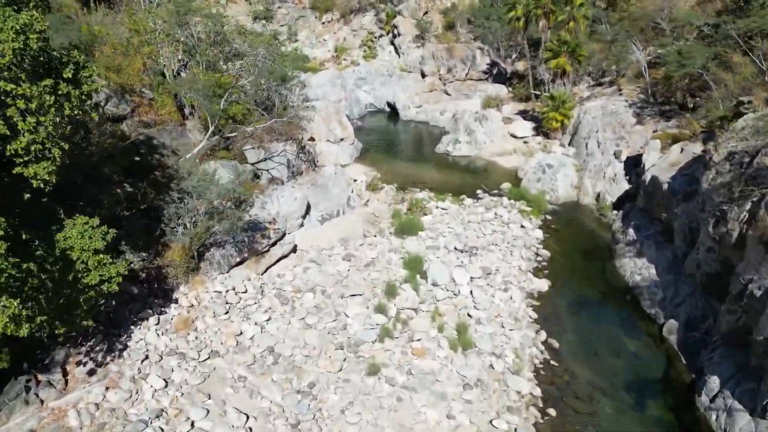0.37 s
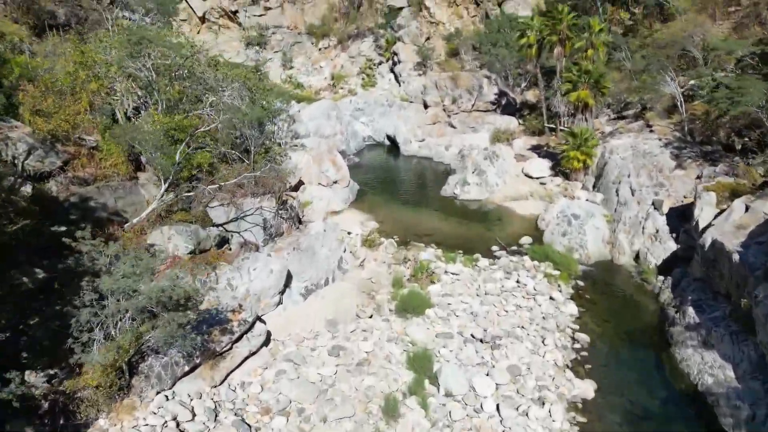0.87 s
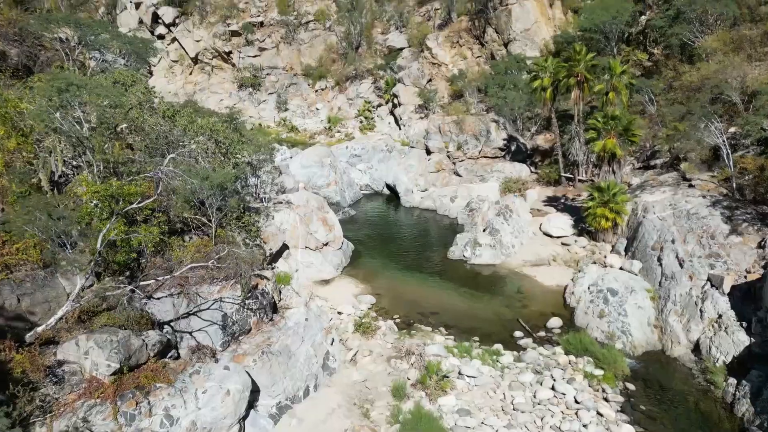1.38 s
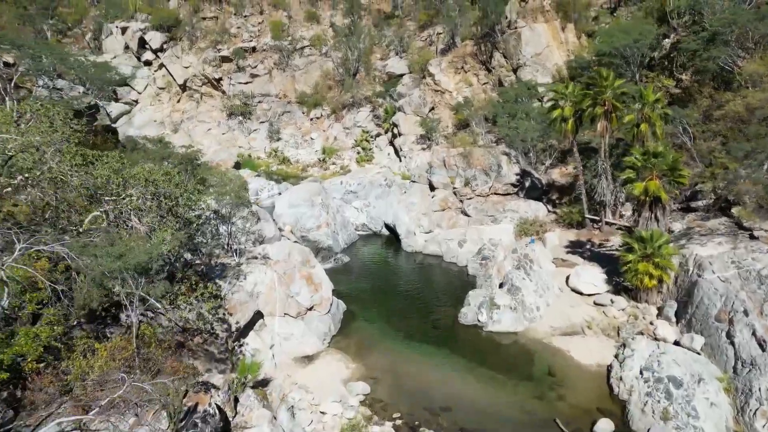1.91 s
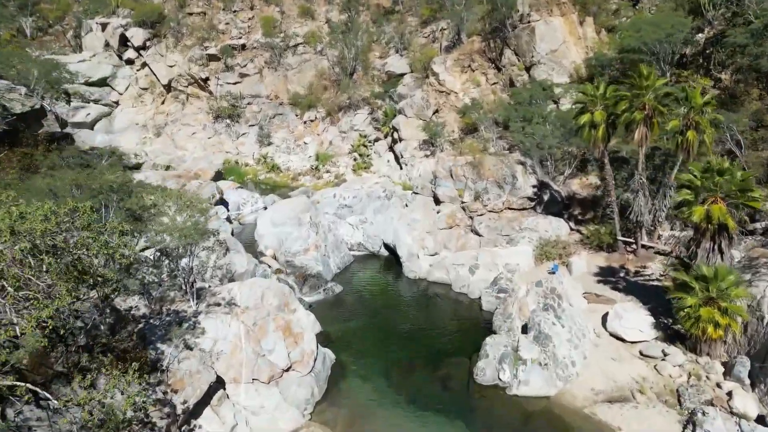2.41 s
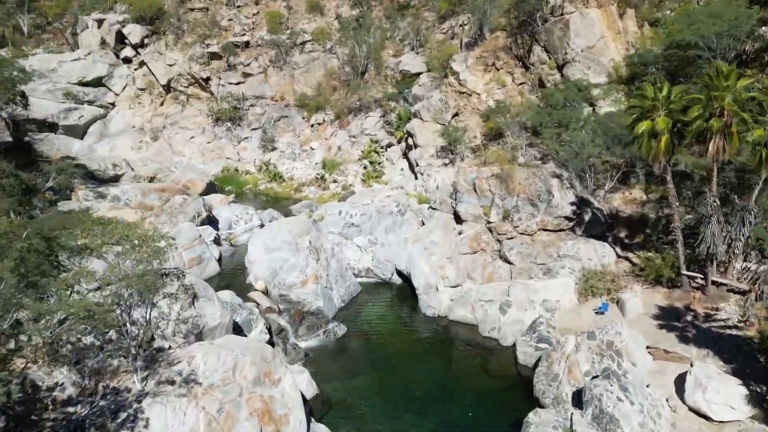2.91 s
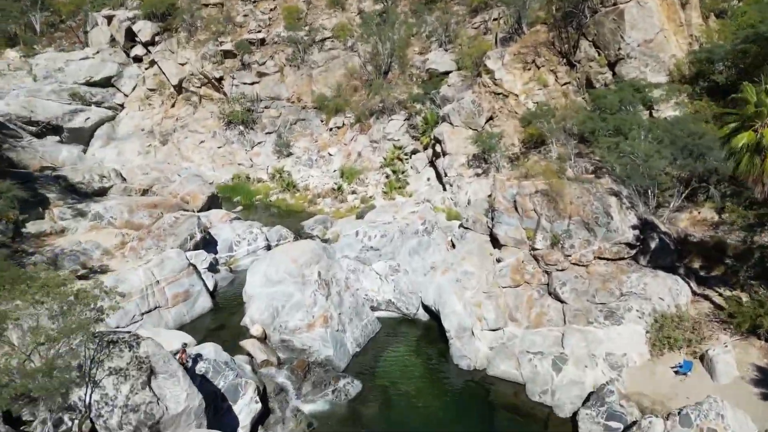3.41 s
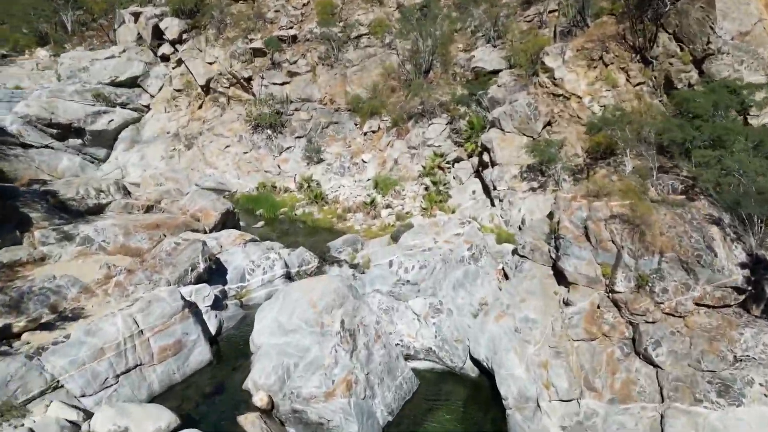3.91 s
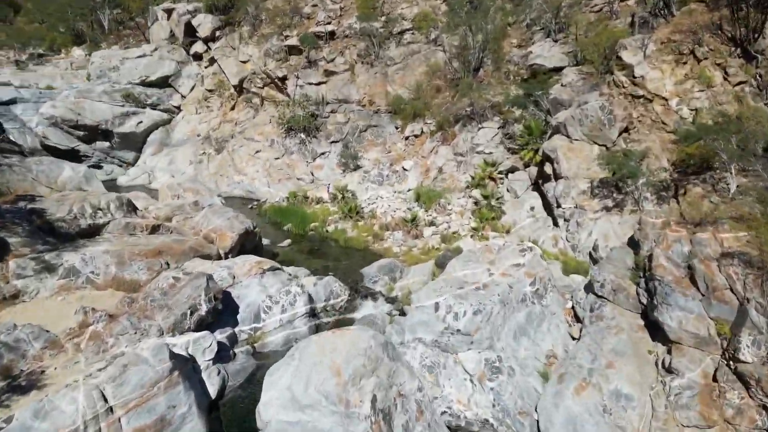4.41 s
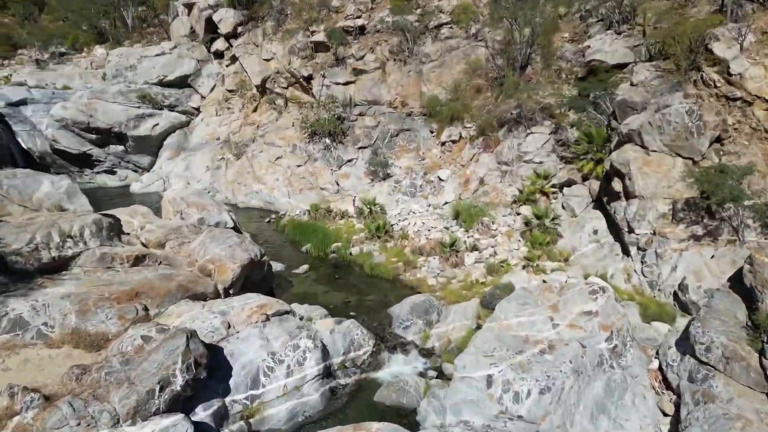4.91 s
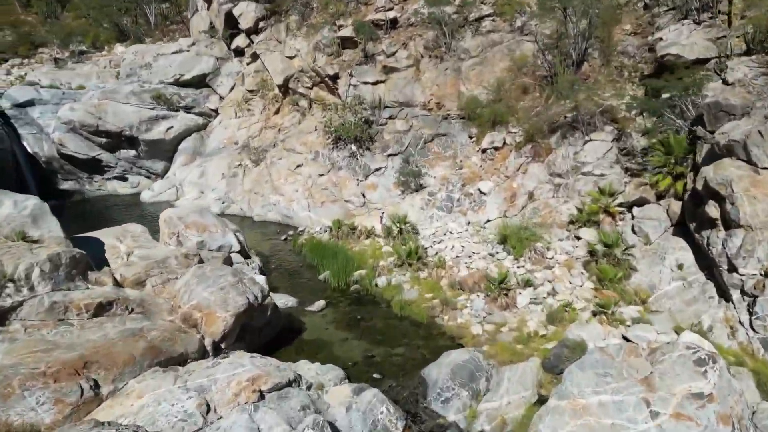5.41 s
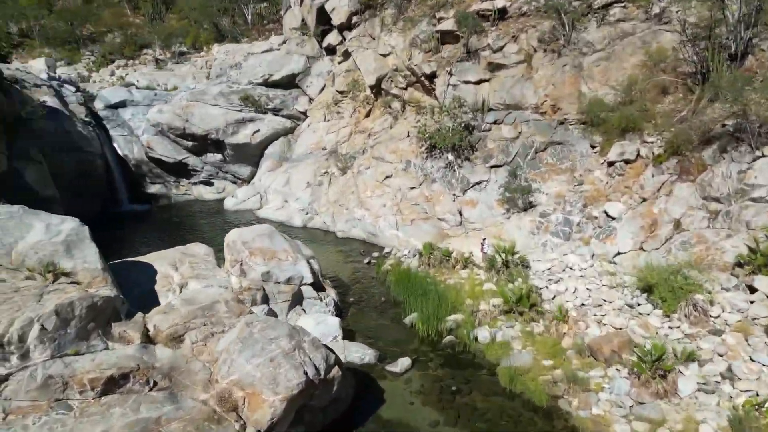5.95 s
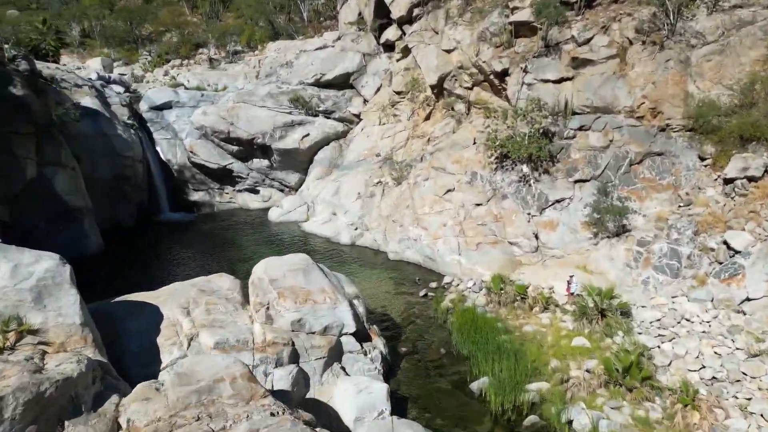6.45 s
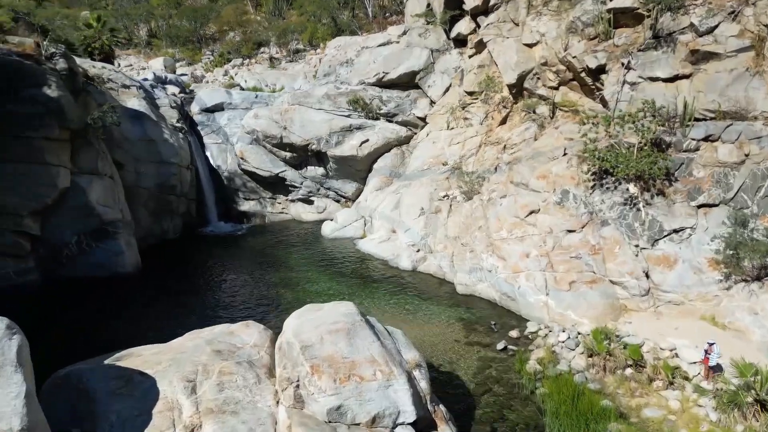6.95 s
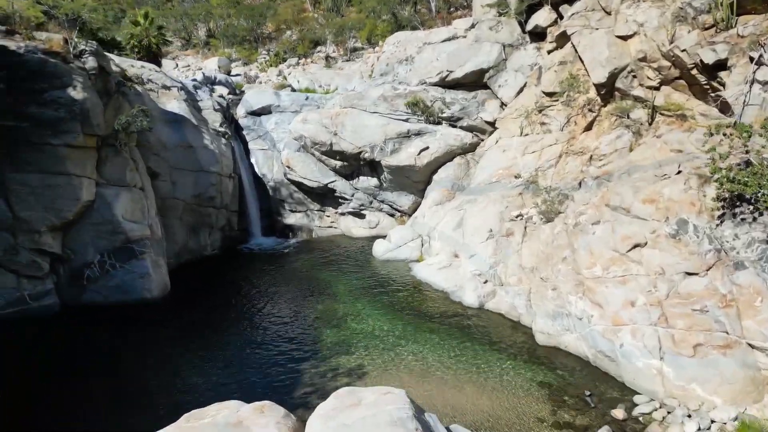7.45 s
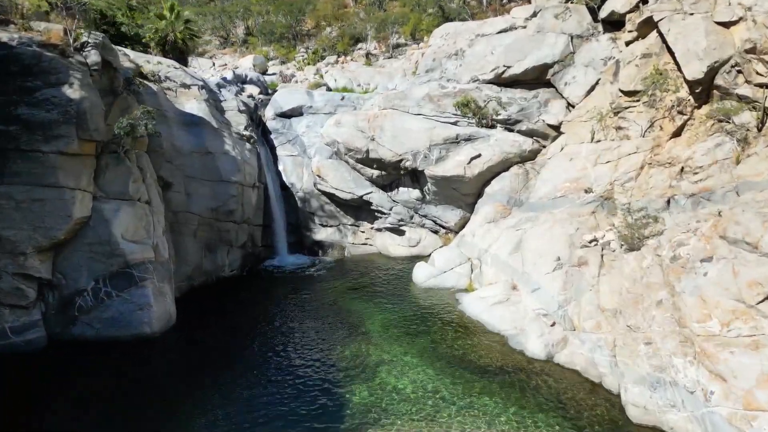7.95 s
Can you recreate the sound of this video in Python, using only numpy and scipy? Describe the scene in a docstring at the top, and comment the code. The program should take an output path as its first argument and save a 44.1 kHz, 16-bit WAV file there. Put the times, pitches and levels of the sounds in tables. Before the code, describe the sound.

Distant splashing water starts quiet and hissy, with bass thinned out. The cascade grows louder, holds, then sinks almost to its first level before a waterfall opens up abruptly and stays steady. From just past three seconds, after a soft thump, rumbling wind pushes on the microphone in heavy low puffs. Open rocky gorge, slight coloration from stone echoes, mono pickup.

```python
"""The rush of white water from a cascade and a waterfall swells, hides and returns as a microphone moves among rocks.
The rush is bubble clicks, noise and ringing air pockets, shaped by a spectrum that varies in time.
Echoes off the stone cut gliding dips into it, and the treble slowly changes colour.
From the third second on the low cut opens with a thump and wind buffets the port as low-frequency pressure noise.
Slaps of water and that thump are knocks: struck, damped resonances."""
import sys
import numpy as np
from scipy import signal
from scipy.io import wavfile
from scipy.ndimage import uniform_filter1d

SR = 44100
rng = np.random.default_rng(int(sys.argv[2]) if len(sys.argv) > 2 else 0)


def ratio(d):
    """dB to gain"""
    e = np.asarray(d, float) / 20
    return 10 ** e


def generate_wav(sig):
    """Save sig (samples, or channels by samples) to the path in sys.argv[1] as 16-bit PCM at SR."""
    pcm = np.round(np.clip(np.atleast_2d(sig).T, -1, 1) * 32767).astype(np.int16)
    wavfile.write(sys.argv[1], SR, pcm)


N = 356328   # length in samples
HOP = 128    # samples between control points

# Level of the rush: t/s, level/dB
RUSH_LEVEL = [(0, -40), (1.3, -40.5), (1.55, -39.5), (1.62, -38.5), (2.0, -35), (2.15, -32.5), (2.4, -31),
              (3.7, -31.5), (4.15, -32), (4.32, -31), (4.5, -34.5), (4.75, -38.5), (5.5, -40),
              (5.72, -40.3), (5.79, -35.5), (5.96, -32), (6.25, -29), (6.55, -30), (7.0, -29.5),
              (8.08, -29.5)]
# Power spectrum of the white water through the microphone, below 3.5 kHz: f/Hz, level per Hz/dB
WATER_LOW_SPECTRUM = [(35, -10), (60, -21), (92, -9), (178, -8), (211, -10.5), (264, -10), (521, -16.5),
                      (757, -19), (1300, -20.5), (3500, -31), (4550, -63), (7700, -120)]
# The same from 3.5 kHz up, relative to the lower spectrum's end: f/Hz, level/dB
WATER_HIGH_SPECTRUM = [(3500, -1.5), (3900, -2.5), (4250, -5), (4650, -2), (5100, -2), (6200, -3.5),
                       (8000, -11), (10000, -15), (10900, -18), (11500, -29), (12200, -30), (13200, -26),
                       (14500, -31), (16000, -43)]
# A notch in the treble that slides down, deepens and fills in: t/s, f/Hz, depth/dB
TREBLE_NOTCH = [(0, 6800, 4), (1, 6760, 4), (2.3, 6700, 11), (3.2, 6200, 8), (3.7, 6120, 8), (4.5, 5980, 3),
                (8.08, 6000, 1.5)]
# Lift of the treble bands: t/s, at 2.7 kHz/dB, presence plateau/dB, at 9.4 kHz/dB, at 11.4 kHz/dB
TREBLE_BANDS = [(0, 0, 7, 4, -1), (1.4, 1, 7.5, 0.5, 3), (2, 0, 7, 0, 8), (2.8, 0.5, 4, 4.5, 4),
                (3.5, 2, 4, 5.5, 1), (4.5, 0, 2.5, 3, 0.5), (5.5, 0, 3, 0.5, 0), (6.2, 0.5, 1, -0.5, -2),
                (7.5, -1, -1.5, -1, 1), (8.08, -1, -1.5, -3.5, 3)]
# Two bands cancelled by rock echoes: t/s, lower dip f/Hz, lower dip depth/dB, upper dip f/Hz
ECHO_DIPS = [(0, 406, 5.5, 1370), (2, 413, 5.5, 1300), (3.2, 470, 5.5, 1440), (3.8, 493, 5, 1600),
             (4.2, 526, 3, 1700), (4.6, 764, 4, 1830), (5.2, 980, 3.5, 2030), (6.4, 1250, 4, 2300),
             (7.5, 1830, 3.5, 2610), (8.08, 1950, 2, 2800)]
# Edge of the low cut under the water: t/s, f/Hz
LOW_CUT_EDGE = [(0, 142), (1.67, 140), (1.74, 201), (1.8, 146.3), (3.45, 143), (3.65, 100), (5.7, 97),
                (6.1, 70), (8.08, 70)]
# Short flares of the wind flutter: t/s, lift/dB
FLUTTER_GUSTS = [(3.45, 10), (3.75, 9.6), (4.18, 4.8), (4.35, 8), (4.65, 9), (5.12, 8), (5.28, 3.1),
                 (5.85, 8), (6.15, 13), (6.57, 12), (6.76, 6), (7.05, 11), (7.3, 14), (7.65, 16), (7.82, 8),
                 (7.99, 7.5)]
# Buffeting of the wind on the port: t/s, level/dB
WIND_BUFFETING = [(3.31, -30), (3.52, -29), (3.68, -15.5), (4.0, -13.5), (4.2, -8.5), (4.45, -12),
                  (4.65, -15), (5.2, -16), (5.65, -17), (6.0, -12), (6.3, -5.5), (6.5, -12), (6.8, -5),
                  (7.2, -9.5), (7.45, -8), (7.6, -10), (7.95, -5.5), (8.08, -13.5)]
# Knocks: slaps of water, and at 3.309 s the thump as the low cut opens:
# t/s, strike level/dB, f/Hz, decay time to -60 dB/s
KNOCKS = [(1.414, -18, 162, 0.043), (1.604, -27, 179, 0.061), (1.837, -24, 257, 0.096),
          (3.309, -10, 189, 0.053), (4.613, -17.5, 1110, 0.011), (5.167, -32, 1260, 0.095)]

# The bass under 350 Hz gains slowly
DEPTH_DB, DEPTH_GAIN_DB_PER_S = -0.36, 0.25
# The upper echo dip holds its depth, then fills in
UPPER_DIP_DB, DIP_HOLDS_S, FILL_DB_PER_S = 4.5, 3.4, 1.5
# Flutter level at 0 dB of buffeting, its dB per dB of buffeting, and the standard deviation of a gust in time
FLUTTER_DB, FLUTTER_FOLLOWS, GUST_S = -24.5, 0.83, 0.092
WIND_STARTS_S = 3.309


def rms_one(x):
    """Normalisation: scales a signal to unit rms."""
    return x / np.sqrt(np.mean(x ** 2) + 1e-20)


def in_time(rows, s):
    """Linear interpolation: the columns of a table at the times s."""
    at, *columns = np.transpose(rows)
    return [np.interp(s, at, column) for column in columns]


def at_hz(points, hz):
    """Logarithmic frequency axis: a spectrum interpolated in log f."""
    at, level_db = np.transpose(points)
    return np.interp(np.log(hz), np.log(at), level_db)


def bell(hz, centre_hz, octaves):
    """Gaussian resonance curve of unit height on the log-frequency axis."""
    return np.exp(-.5 * (np.log2(hz / centre_hz) / octaves) ** 2)


def drift(rate, step_s, size):
    """Low-passed randomness: rows of noise through a double pole, scaled to unit deviation."""
    r = np.exp(-2 * np.pi * rate * step_s)
    run_in = 2000
    noise = rng.standard_normal((size[0], size[1] + run_in))
    slow = signal.lfilter([1], [1, -2 * r, r * r], noise)[:, run_in:]
    return slow / slow.std()


def ring(clicks, hz, t60):
    """Damped resonance: a unit click excites a decaying sine of unit initial height."""
    r, w = ratio(-60 / (t60 * SR)), 2 * np.pi * hz / SR
    return signal.lfilter([0, np.sin(w)], [1, -2 * r * np.cos(w), r * r], clicks + 1e-18)


def water():
    """Time-varying filtering: broadband white water shaped by treble, rock echoes and churn."""
    pockets = gurgles(per_s=900., cycles=22.4, spread_db=2.5)
    source = foam(per_s=6000., spread_db=3., share=0.13) + ratio(-12.5) * pockets
    hz, s, cells = signal.stft(source, SR, nperseg=8 * HOP, noverlap=7 * HOP)
    hz = np.maximum(hz, 1)[:, None]

    low_part = at_hz(WATER_LOW_SPECTRUM, hz)
    high_part = at_hz(WATER_LOW_SPECTRUM, 3500) + at_hz(WATER_HIGH_SPECTRUM, hz)
    colour = np.where(hz < 3500, low_part, high_part)
    depth_db = DEPTH_DB + DEPTH_GAIN_DB_PER_S * s
    colour = colour + depth_db / (1 + (hz / 350) ** 4)

    bite_db, presence_db, air_db, top_db = in_time(TREBLE_BANDS, s)
    notch_hz, notch_db = in_time(TREBLE_NOTCH, s)
    # the presence plateau breaks off just below the notch
    plateau = 1 / (1 + (4400 / hz) ** 8.0) / (1 + (hz / (0.98 * notch_hz)) ** 47.0)
    colour = colour + presence_db * plateau
    colour = colour + bite_db * bell(hz, 2700, 0.36)
    colour = colour + air_db * bell(hz, 9400, 0.36)
    colour = colour + top_db * bell(hz, 11400, 0.15)
    colour = colour - notch_db * bell(hz, notch_hz, 0.057)

    low_hz, low_db, high_hz = in_time(ECHO_DIPS, s)
    high_db = np.maximum(UPPER_DIP_DB - FILL_DB_PER_S * np.maximum(s - DIP_HOLDS_S, 0), 0)
    colour = colour - low_db * bell(hz, low_hz, 0.23) - high_db * bell(hz, high_hz, 0.12)

    # the middle band carries the level
    middle = (hz[:, 0] > 500) & (hz[:, 0] < 6000)
    colour = colour - 10 * np.log10(np.sum(ratio(2 * colour[middle]), axis=0) / len(hz))
    colour = colour + churn(hz, s, together_db=0.36, patch_db=0.49, swirl_db=0.25)
    gain = ratio(colour + in_time(RUSH_LEVEL, s)[0])
    return signal.istft(cells * gain, SR, nperseg=8 * HOP, noverlap=7 * HOP)[1][:N]


def foam(per_s, spread_db, share):
    """Shot noise: bursting bubbles as dense uneven clicks over smooth noise, flat in spectrum."""
    sizes = ratio(spread_db * np.minimum(rng.exponential(1, N), 5)) * rng.choice([-1, 1], N)
    bursts = rms_one(sizes * (rng.random(N) < per_s / SR))
    # share is the part of the power in the clicks
    return np.sqrt(share) * bursts + np.sqrt(1 - share) * rng.standard_normal(N)


def gurgles(per_s, cycles, spread_db):
    """Bubble resonance: air pockets born in clumps ring down by 60 dB in a set number of cycles."""
    frames = N // HOP + 1
    clumps = np.interp(np.arange(N) / HOP, np.arange(frames), drift(5., HOP / SR, (1, frames))[0])
    sizes = ratio(spread_db * np.minimum(rng.exponential(1, N), 4)) * rng.choice([-1, 1], N)
    born = rng.random(N) < per_s * ratio(2.2 * clumps) / SR
    pitches = np.geomspace(140, 2000, 24)
    dealt = rng.integers(0, 24, N)
    out = np.zeros(N)
    for k, hz in enumerate(pitches):
        ringing = rms_one(ring(sizes * born * (dealt == k), hz, cycles / hz))
        out += ringing * np.sqrt(hz / SR)   # equal power per Hz from the bass to the middle
    return out


def churn(hz, s, together_db, patch_db, swirl_db):
    """Turbulent modulation: common surges, quick octave-wide patches, slow narrow-band swirls."""
    def spread(rate, count):
        """Power-preserving crossfade of independent drifts from band to band."""
        rows = drift(rate, HOP / SR, (count, len(s)))
        place = np.interp(np.log(hz[:, 0]), np.log([60, 16000]), [0, count - 1.001])
        low, part = place.astype(int), (place % 1)[:, None]
        return rows[low] * np.cos(part * np.pi / 2) + rows[low + 1] * np.sin(part * np.pi / 2)

    # spray surges most in the treble
    surge = drift(27.0, HOP / SR, (1, len(s))) * (hz / 4000) ** .25
    return together_db * surge + patch_db * spread(38.0, count=9) + swirl_db * spread(1.6, count=30)


def knocks():
    """Impulse excitation: at each slap of water, and as the low cut opens, a damped resonance knocks."""
    out = np.zeros(N)
    for s, strike_db, hz, t60 in KNOCKS:
        click = np.zeros(N)
        click[round(s * SR)] = ratio(strike_db)
        out += ring(click, hz, t60)
    return out


def low_cut(x, leak_db):
    """High-pass filtering: a steep moving edge removes the bass but for a little leakage."""
    hz, s, cells = signal.stft(x, SR, nperseg=32 * HOP, noverlap=28 * HOP)
    edge_hz, = in_time(LOW_CUT_EDGE, s)
    passed = 1 / np.sqrt(1 + (edge_hz / np.maximum(hz, 1)[:, None]) ** 53.0)
    return signal.istft(cells * (passed + ratio(leak_db)), SR, nperseg=32 * HOP, noverlap=28 * HOP)[1][:N]


def wind():
    """Turbulent pressure: eddies on the port give slow buffeting and a quicker, lumpier flutter."""
    def eddies(low_hz, high_hz):
        """Band-limited noise: the pressure of one eddy size, after a second of run-in."""
        sos = signal.butter(2, [low_hz, high_hz], "band", fs=SR, output="sos")
        return rms_one(signal.sosfilt(sos, rng.standard_normal(N + SR))[SR:])

    s = np.arange(N) / SR
    buffet_db, = in_time(WIND_BUFFETING, s)
    flutter_db = FLUTTER_DB + FLUTTER_FOLLOWS * buffet_db
    for at, lift_db in FLUTTER_GUSTS:
        flutter_db = flutter_db + lift_db * np.exp(-.5 * ((s - at) / GUST_S) ** 2)

    # big eddies roll off steeply
    buffet = signal.sosfilt(signal.butter(2, 55., fs=SR, output="sos"), eddies(5.6, 23.6))
    # the gusts set the level, not chance
    buffet /= np.sqrt(uniform_filter1d(buffet ** 2, size=SR // 6) + 0.34)

    points = N * 100 // SR + 1
    lumps_db = 2.9 * np.interp(s * 100, np.arange(points), drift(7.8, 0.0096, (1, points))[0])
    flutter = rms_one(eddies(22.5, 56.4) * ratio(lumps_db))

    opened = np.clip((s - WIND_STARTS_S) / .004, 0, 1)
    # the first push arrives whole, as one slow swing
    push = np.zeros(N)
    push[round(WIND_STARTS_S * SR) + SR // 100] = -ratio(-19.0)
    return opened * (ratio(buffet_db) * buffet + ratio(flutter_db) * flutter) + ring(push, 16.0, 0.32)


def scene():
    """Superposition: water and knocks behind the low cut, wind straight on the port."""
    behind_cut = low_cut(water() + knocks(), leak_db=-28.5)
    return (behind_cut + wind())[None]


def low_pass(x):
    """Removes everything above the highest recorded frequency."""
    return signal.sosfilt(signal.butter(12, 15150, fs=SR, output="sos"), x)


def record(dry):
    """Soft saturation: a hyperbolic tangent rounds the peaks."""
    mix = 1.149 * np.tanh(dry / 1.234)
    return low_pass(mix)


dry = scene()
out = record(dry)
generate_wav(out)
```